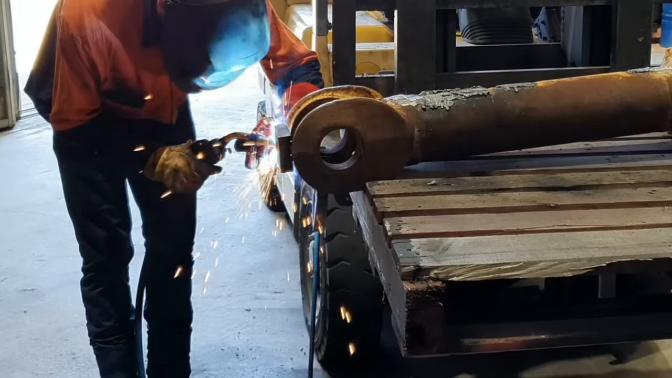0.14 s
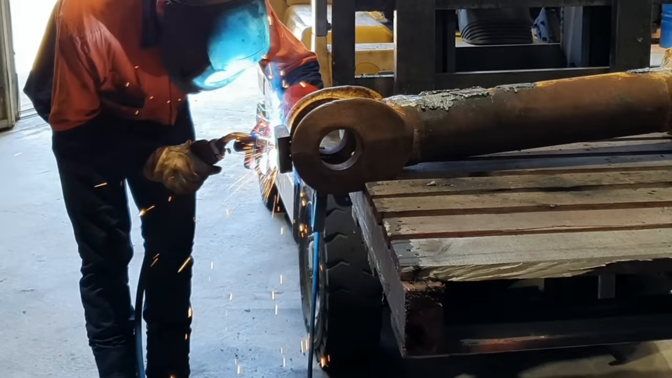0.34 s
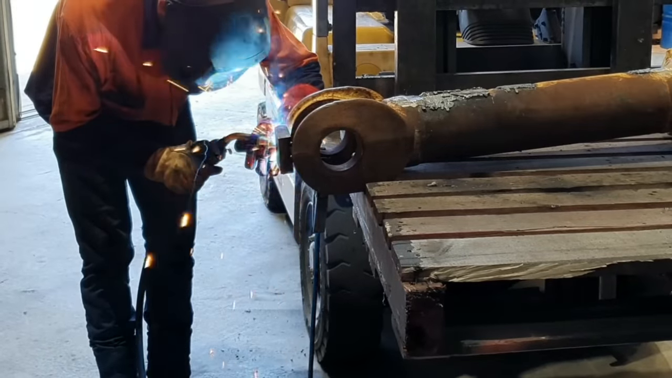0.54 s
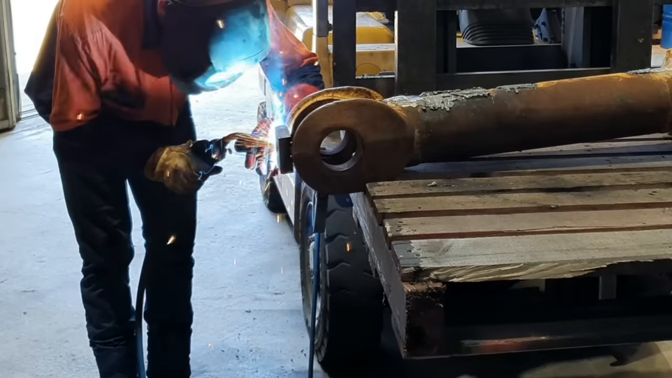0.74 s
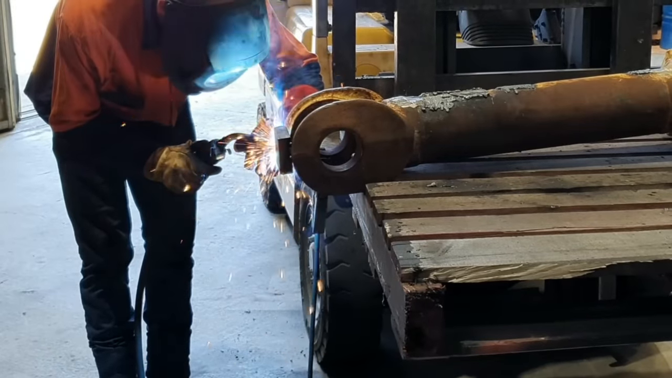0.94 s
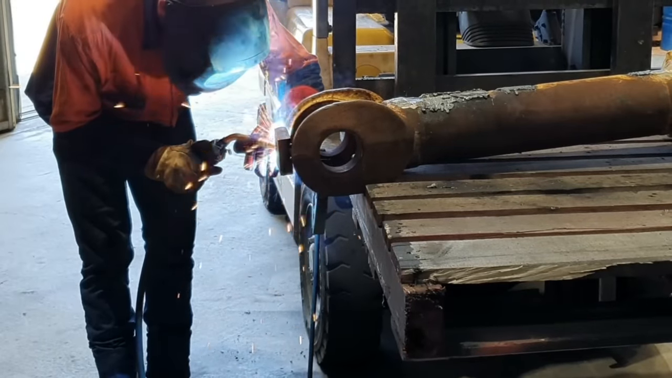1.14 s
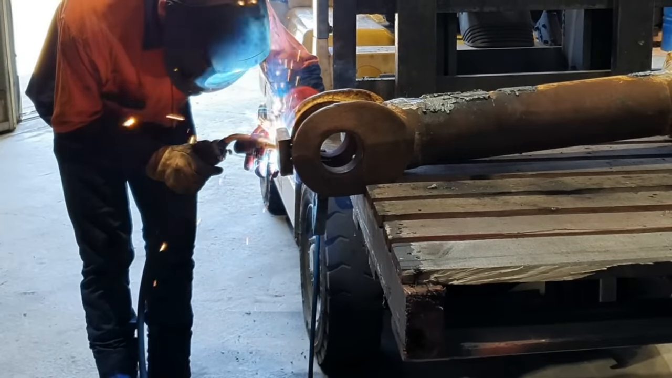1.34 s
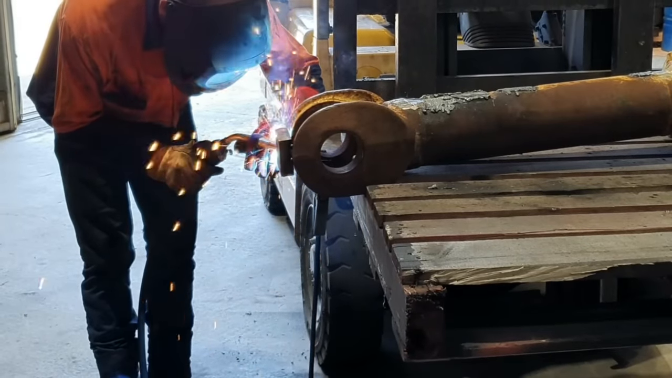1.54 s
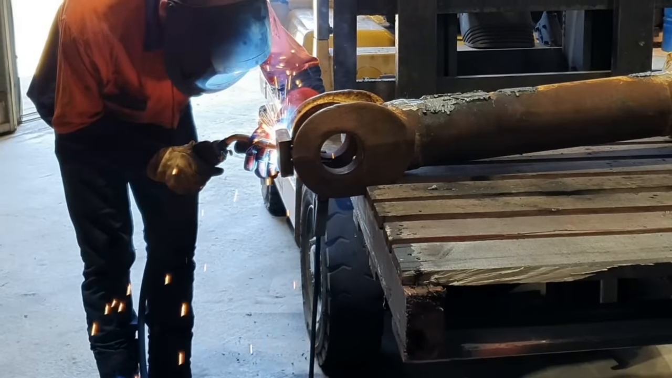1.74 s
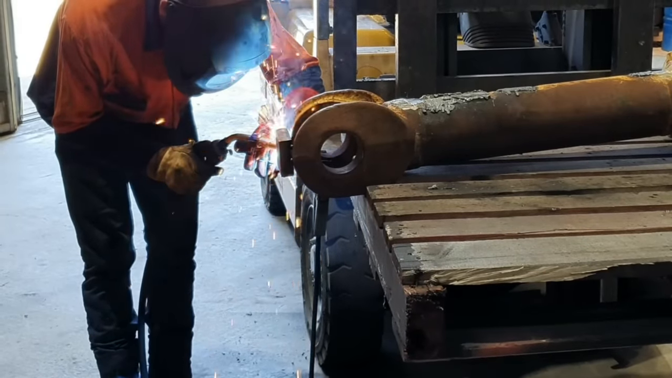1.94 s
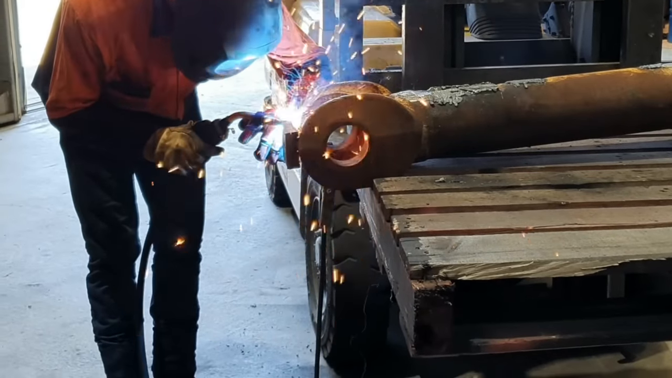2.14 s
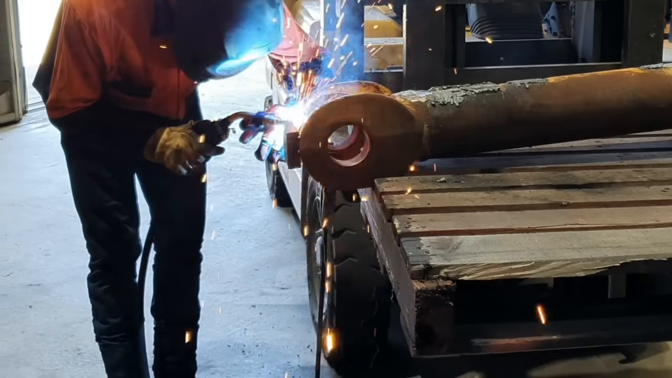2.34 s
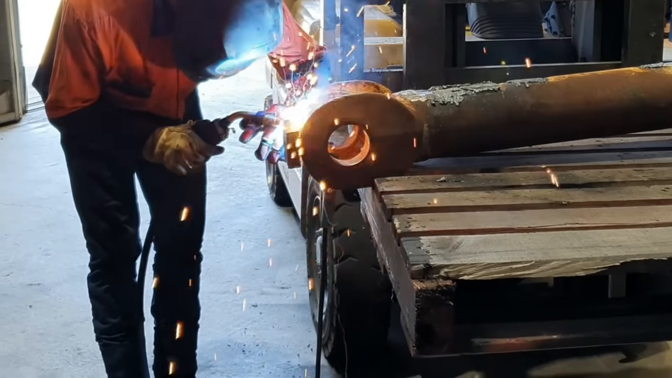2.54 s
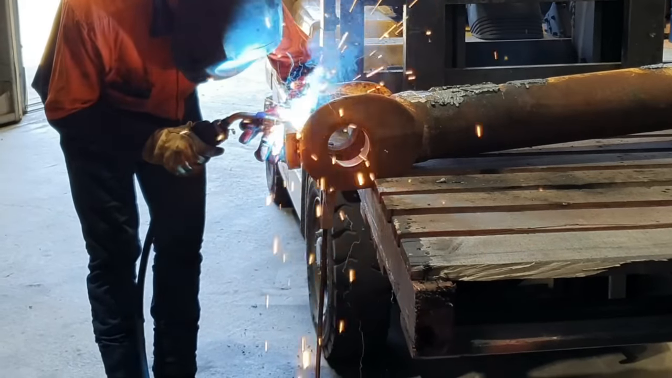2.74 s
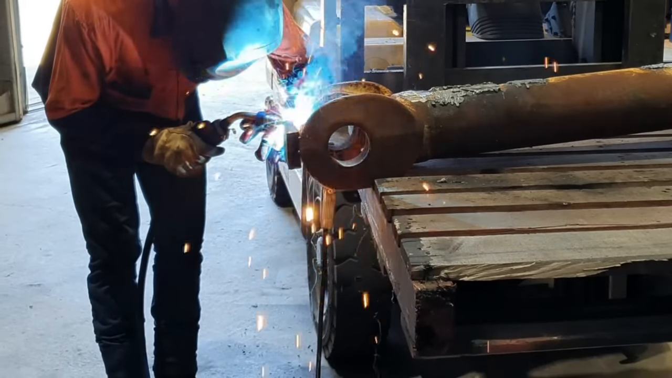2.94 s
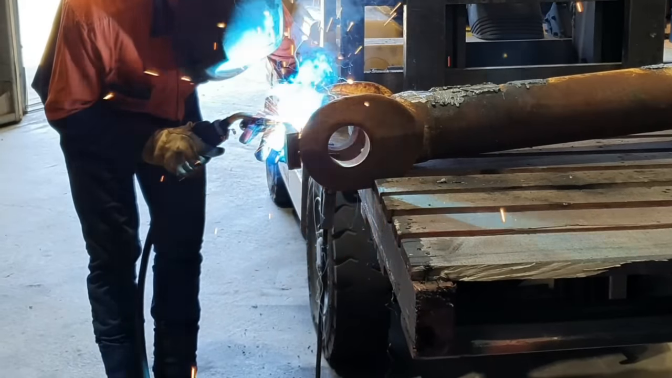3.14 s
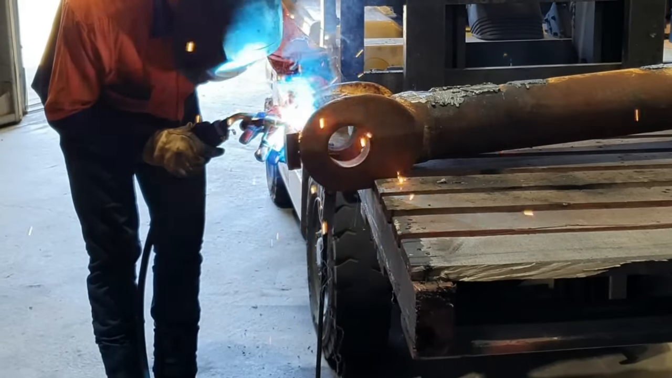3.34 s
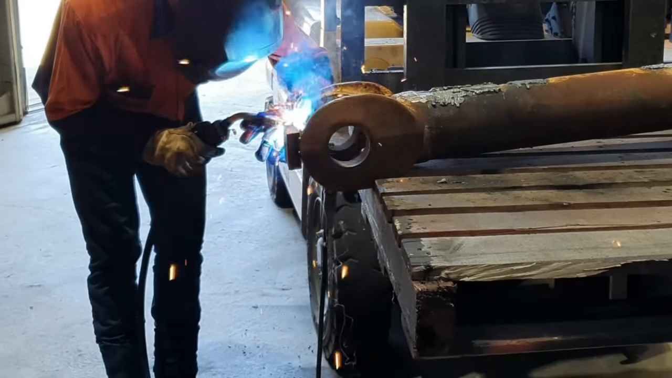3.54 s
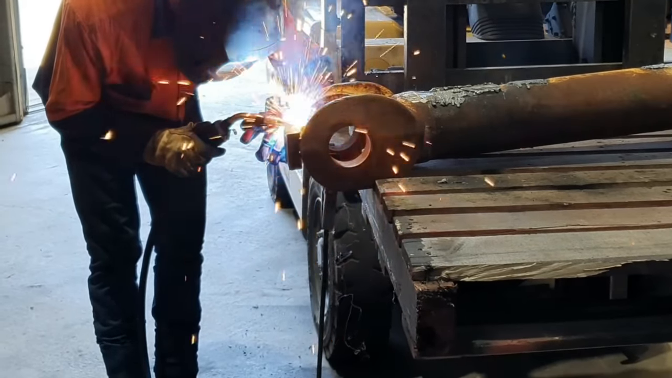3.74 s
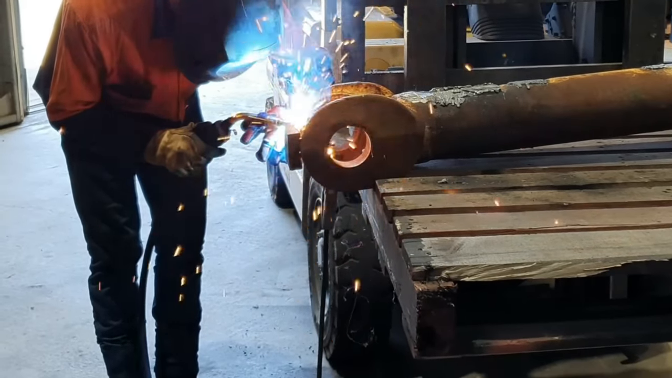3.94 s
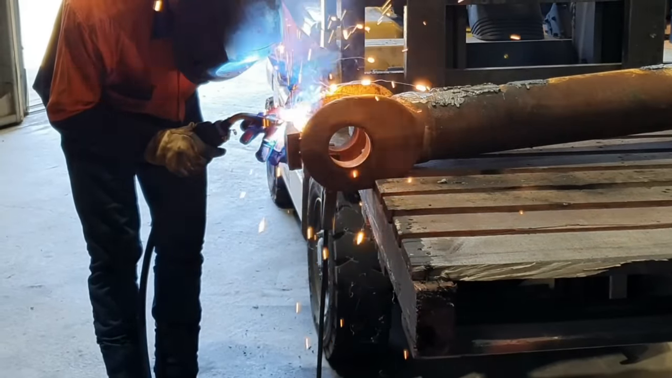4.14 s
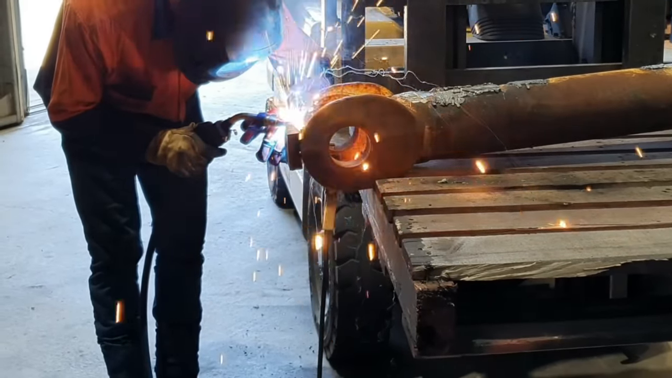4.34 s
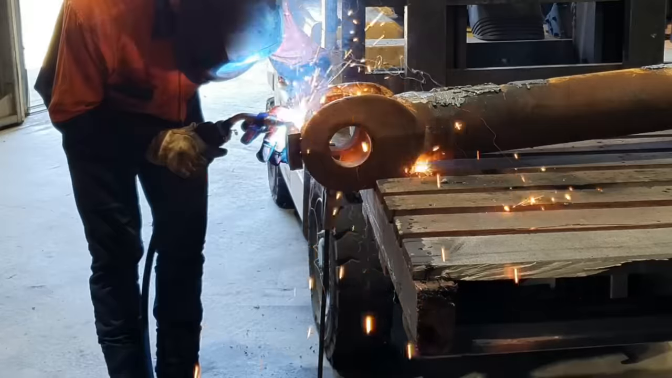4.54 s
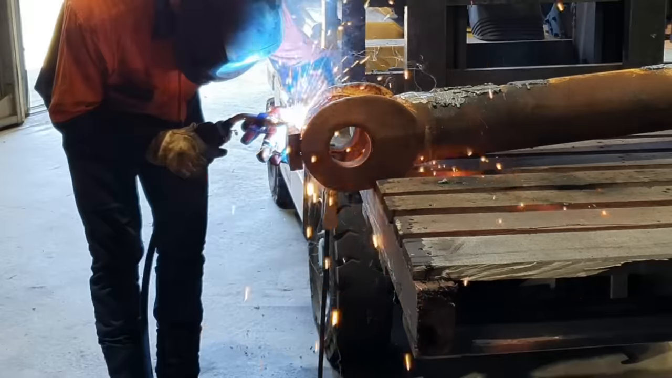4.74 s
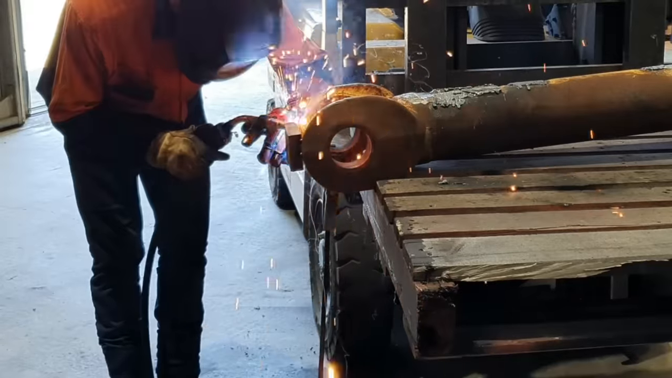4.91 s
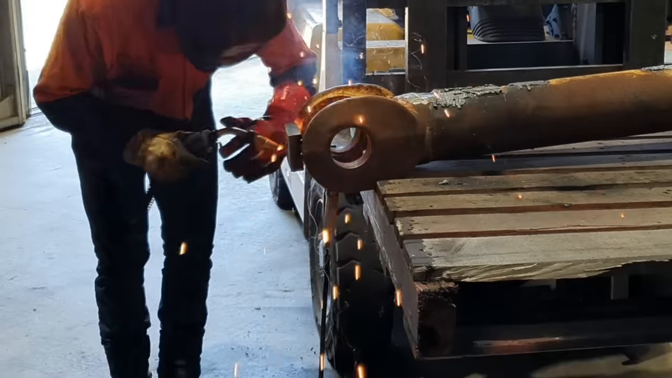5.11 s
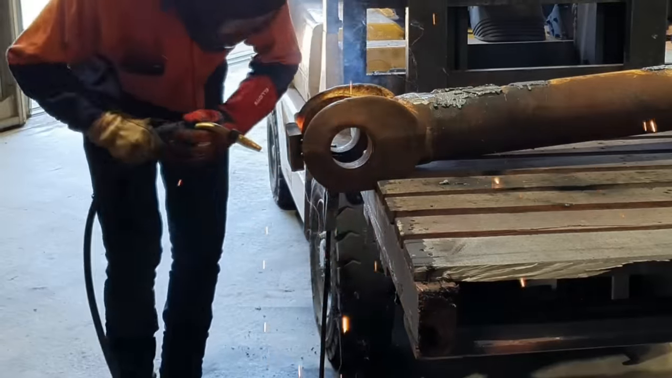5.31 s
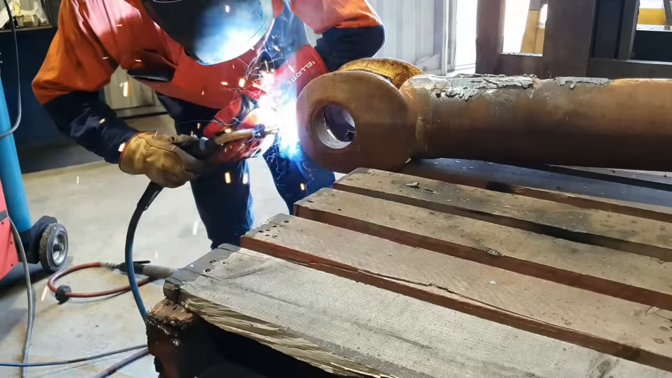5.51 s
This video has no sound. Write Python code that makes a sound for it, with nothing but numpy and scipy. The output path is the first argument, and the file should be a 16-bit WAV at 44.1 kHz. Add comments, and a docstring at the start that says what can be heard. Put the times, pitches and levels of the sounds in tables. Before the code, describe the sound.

Sharp rapid snaps and fizzing spatter from wire welding on steel in a hard workshop, a brief humming lull, then a cut-off restart.

```python
"""In a workshop, a MIG welder runs beads on a steel eye. Some fifty-five times a second the wire dips into the pool,
shorts, and the arc relights with a snap; each snap is a click with a dull pop and a brief spray of noise.
Between the snaps spatter crackles: random droplet clicks over a hiss. Delayed copies stand for the steel close by,
a fading noise tail for the hard room. A low rumble with a surging drone, made of shaped noise and an unsteady sine,
grows behind it and comes to the front, with soft air noise, while the arc rests, until a last weld starts abruptly."""
import sys
import numpy as np
from scipy import signal
from scipy.fft import rfft, irfft
from scipy.io import wavfile
from scipy.ndimage import uniform_filter1d

SR = 44100
rng = np.random.default_rng(int(sys.argv[2]) if len(sys.argv) > 2 else 0)


def pcm_store(signal):
    """Save signal as 16-bit PCM."""
    levels = np.round(np.clip(np.atleast_2d(signal), -1, 1) * 32767)
    wavfile.write(sys.argv[1], SR, levels.astype(np.int16).T)


N = 245637
TIME = np.arange(N) / SR
HZ = np.fft.rfftfreq(4096, 1 / SR)
# the torch moves on, the arc goes out, the last weld starts (s)
SECOND_BEAD_S, ARC_OFF_S, LAST_BEAD_S = 2.205, 4.965, 5.5125
# top of the sound's band (Hz)
EDGE_HZ = 15820
# The hardest snaps. Each row: time in seconds, level in dB and dull pop in dB, both before the gains in dips().
HARD_SNAPS = [(0.0188, -22.5, -13), (0.0397, -23.5, -11), (0.0583, -21.5, -15), (0.0745, -23.0, -14),
              (0.0937, -22.0, -12), (0.1114, -22.0, -11), (0.1307, -23.0, -10), (0.1476, -21.0, -14),
              (0.1533, -22.5, -12), (0.1835, -21.0, -12), (0.1938, -25.5, -10), (0.2072, -23.0, -9),
              (0.225, -24.5, -11), (0.2431, -22.5, -9), (0.2614, -23.5, -10), (0.2803, -22.0, -6),
              (0.2935, -23.0, -13), (0.3062, -23.5, -12), (0.3253, -21.5, -13), (0.373, -21.5, -14),
              (0.3788, -22.5, -11), (0.3903, -21.5, -11), (0.4079, -23.5, -9), (0.4289, -23.0, -12),
              (0.4756, -23.5, -13), (0.5549, -24.0, -11), (0.574, -20.0, -14), (0.5905, -23.0, -11),
              (0.6385, -22.0, -12), (0.6899, -23.0, -15), (0.7032, -21.5, -14), (0.7139, -24.0, -14),
              (0.7215, -23.0, -11), (0.7399, -23.5, -11), (0.7617, -22.5, -9), (0.7957, -21.5, -14),
              (0.8129, -24.5, -12), (0.8454, -22.5, -16), (0.8661, -24.5, -12), (0.9009, -22.5, -9),
              (0.915, -25.5, -10), (0.9328, -22.0, -10), (0.9464, -23.0, -13), (0.963, -22.0, -10),
              (0.9976, -24.0, -14), (1.0134, -23.5, -12), (1.0311, -23.5, -10), (1.0835, -21.5, -11),
              (1.0977, -24.0, -8), (1.1211, -20.5, -11), (1.1529, -22.0, -11), (1.1651, -24.5, -12),
              (1.1893, -23.0, -12), (1.2136, -24.0, -11), (1.2479, -22.0, -14), (1.2751, -21.0, -14),
              (1.2942, -21.5, -12), (1.3078, -22.0, -14), (1.3316, -18.5, -15), (1.3526, -21.5, -16),
              (1.3657, -19.0, -13), (1.3884, -22.0, -12), (1.4059, -22.5, -14), (1.4255, -22.0, -18),
              (1.4608, -20.0, -17), (1.4748, -18.5, -16), (1.5075, -23.0, -11), (1.5212, -21.5, -14),
              (1.5353, -22.0, -15), (1.5574, -19.5, -18), (1.5702, -21.5, -13), (1.5854, -20.0, -15),
              (1.6063, -21.5, -14), (1.6212, -18.5, -15), (1.6512, -21.0, -18), (1.6657, -18.0, -16),
              (1.6836, -21.0, -15), (1.6958, -21.0, -13), (1.714, -18.5, -17), (1.7302, -18.0, -16),
              (1.7473, -19.0, -16), (1.7609, -19.5, -13), (1.7827, -20.5, -18), (1.8032, -16.5, -16),
              (1.8199, -17.5, -18), (1.8356, -19.5, -17), (1.8677, -20.5, -15), (1.8769, -20.5, -16),
              (1.9075, -18.0, -16), (1.9336, -17.0, -17), (1.9686, -22.0, -19), (1.9835, -18.5, -16),
              (2.0009, -18.0, -16), (2.0172, -18.5, -14), (2.0354, -17.5, -15), (2.0523, -22.0, -13),
              (2.0688, -17.5, -13), (2.096, -16.0, -17), (2.1616, -17.0, -13), (2.1725, -18.5, -14),
              (2.2093, -18.5, -16), (2.2333, -18.0, -16), (2.258, -17.5, -16), (2.3129, -22.0, -14),
              (2.3269, -21.0, -14), (2.3378, -22.0, -12), (2.3571, -17.5, -15), (2.3817, -21.0, -13),
              (2.3952, -18.0, -14), (2.4228, -17.5, -16), (2.4481, -20.5, -15), (2.4866, -20.5, -12),
              (2.5178, -21.0, -11), (2.5442, -21.5, -11), (2.5775, -20.0, -14), (2.6339, -21.5, -13),
              (2.6719, -21.5, -11), (2.6903, -18.5, -11), (2.7048, -19.5, -19), (2.768, -22.5, -14),
              (2.8011, -24.0, -19), (2.836, -22.0, -13), (2.869, -22.5, -19), (2.9113, -24.0, -17),
              (2.9859, -25.0, -11), (3.0262, -19.0, -15), (3.0459, -24.0, -19), (3.1075, -24.5, -16),
              (3.1476, -18.0, -14), (3.1657, -18.0, -13), (3.1987, -24.0, -19), (3.2086, -23.5, -12),
              (3.2304, -23.5, -13), (3.2559, -18.5, -14), (3.2678, -23.5, -12), (3.3091, -24.5, -13),
              (3.3522, -19.0, -13), (3.3709, -22.0, -16), (3.3818, -23.5, -14), (3.4282, -23.0, -17),
              (3.4529, -18.5, -18), (3.4716, -18.0, -15), (3.527, -24.5, -14), (3.5332, -24.5, -11),
              (3.5433, -22.0, -13), (3.6088, -21.5, -14), (3.6272, -19.5, -16), (3.6336, -22.0, -11),
              (3.6466, -17.0, -14), (3.6626, -18.5, -16), (3.681, -19.5, -16), (3.7044, -18.0, -14),
              (3.7248, -19.0, -10), (3.7506, -19.0, -13), (3.7696, -18.5, -15), (3.793, -21.0, -7),
              (3.8122, -20.0, -17), (3.822, -21.5, -15), (3.841, -22.5, -17), (3.8673, -22.5, -16),
              (3.8855, -19.0, -13), (3.8963, -19.0, -13), (3.9148, -19.0, -14), (3.9392, -19.5, -13),
              (3.9583, -18.0, -17), (3.97, -21.5, -17), (3.991, -21.0, -15), (4.0036, -20.0, -15),
              (4.028, -20.5, -13), (4.0842, -19.5, -15), (4.1023, -20.5, -12), (4.1215, -20.5, -11),
              (4.1465, -19.5, -15), (4.1664, -20.0, -15), (4.191, -18.5, -15), (4.2136, -17.0, -19),
              (4.2339, -18.5, -15), (4.2563, -17.5, -16), (4.28, -16.5, -17), (4.3032, -18.5, -17),
              (4.3375, -17.5, -16), (4.3534, -17.5, -18), (4.3735, -19.5, -14), (4.3931, -18.0, -18),
              (4.4119, -16.5, -16), (4.43, -18.5, -17), (4.4478, -21.0, -16), (4.4664, -19.0, -19),
              (4.4857, -18.0, -15), (4.5152, -22.0, -16), (4.5357, -19.0, -18), (4.5531, -18.5, -18),
              (4.5711, -18.0, -19), (4.5907, -18.0, -17), (4.625, -20.5, -15), (4.6456, -17.5, -15),
              (4.6636, -17.5, -16), (4.6967, -21.0, -19), (4.7113, -16.5, -17), (4.7285, -21.5, -15),
              (4.7503, -21.5, -15), (4.7658, -19.0, -17), (4.7853, -18.0, -17), (4.8034, -19.0, -18),
              (4.8234, -20.0, -16), (4.8522, -20.0, -17), (4.8716, -20.5, -17), (4.8814, -22.0, -15),
              (4.9078, -21.0, -16), (5.5401, -22, -16), (5.5439, -31, -15), (5.5484, -29, -18),
              (5.567, -22, -15)]


def amp(db):
    """Turns decibels into a plain gain."""
    return 10 ** (np.asarray(db) / 20)


def unit(x):
    """Scales a sound to an rms (average strength) of 1."""
    return x / np.sqrt(np.mean(abs(x) ** 2) + 1e-20)


def read(points, hz):
    """Reads a table between its points, along log frequency."""
    f, value = np.transpose(points)
    return np.interp(np.log(hz + 1), np.log(f + 1), value)


def curve(points):
    """Reads a table between its points, along time."""
    return np.interp(TIME, *np.transpose(points))


def causal(db):
    """Makes the filter that has this gain over HZ and responds as promptly as possible."""
    cepstrum = irfft(np.log(amp(np.maximum(db, db.max() - 80))))
    half = len(HZ) - 1
    # folding the second half onto the first leaves nothing sounding ahead of its cause
    cepstrum[..., 1:half] *= 2
    cepstrum[..., half + 1:] = 0
    return irfft(np.exp(rfft(cepstrum)))


def through(x, response):
    """Passes a sound through a response, channel by channel."""
    return signal.fftconvolve(np.atleast_2d(x), np.atleast_2d(response), axes=1)[:, :N]


def clicks(s, size):
    """Places single-sample clicks at the times s (seconds)."""
    place = np.clip(np.round(s * SR).astype(int), 0, N - 1)
    return np.bincount(place, size, N)


def diffuse(length):
    """Makes spectra of noise arriving from all sides: alike at both microphone ports only in the bass."""
    # Each row: frequency in Hz, left-right likeness from 0 to 1.
    likeness = [(60, 0.93), (130, 0.99), (290, 0.85), (640, 0.48), (1400, 0.013), (16000, 0.0084)]
    hz = np.fft.rfftfreq(length, 1 / SR)
    a, b = np.exp(2j * np.pi * rng.random((2, len(hz))))
    alike = np.clip(read(likeness, hz), -1, 1)
    return hz, np.array([a, alike * a + np.sqrt(1 - alike ** 2) * b])


def arc_state():
    """How the arc runs: ordinary snaps (dB, before the gain in snaps()), sizzle and throatiness (dB)."""
    # Each row: time in seconds, ordinary snaps in dB, sizzle in dB, lift of the sizzle's low mids in dB.
    arc_rows = [(0, -27, -28, 11), (.35, -27.5, -33.5, -13), (.5, -27, -30, 6), (.66, -27, -36.5, 10.5),
                (.8, -25, -33, 8.5), (.9, -26.5, -32, 15.5), (1.05, -26.5, -34, 6), (1.3, -26.5, -32, 11.5),
                (1.8, -24.5, -30, -11), (2.2, -24.5, -32.5, -9), (2.681, -24, -27.5, -14),
                (2.95, -27, -33, 10.5), (3.1, -28, -34, 2), (3.249, -28, -33, 11), (3.499, -26, -32, -2),
                (3.588, -31, -31, 2), (3.65, -15, -33, -6), (3.85, -27, -28.5, 5), (4.06, -26, -35, 6),
                (4.3, -24.5, -38, -24), (4.96, -23, -27, 1)]
    s, *columns = np.transpose(arc_rows)
    return [np.interp(TIME, s, column) for column in columns]


def dips(dips_per_s=55, jitter_cycles=.13, steady_db=-23, jitter_per_db=.18):
    """Time, level and pop of each snap: the wire keeps a loose rhythm between hard snaps, looser when weak."""
    spread_db, pop_db, pop_spread_db = 1.3, 9, 2.5
    hard_gain_db, hard_pop_gain_db = 1.5, 21.5
    hard_s, hard_db, hard_pop_db = np.transpose(HARD_SNAPS)
    marks = np.r_[0, np.sort(hard_s[hard_s < ARC_OFF_S]), ARC_OFF_S]
    # fit a whole number of dips between neighbouring marks
    steps = np.maximum(np.round(np.diff(marks) * dips_per_s), 1)
    cycles = np.r_[0, np.cumsum(steps)]
    free = np.setdiff1d(np.arange(cycles[-1]), cycles)
    late, size, dull = np.clip(rng.standard_normal((N, 3))[:len(free)].T, -2, 2)
    db = np.interp(np.interp(free, cycles, marks), TIME, arc_state()[0])
    jitter = jitter_cycles + jitter_per_db * np.maximum(steady_db - db, 0)
    s = np.interp(free + jitter * late, cycles, marks)
    return (np.r_[s, hard_s], np.r_[db + spread_db * size, hard_db + hard_gain_db],
            np.r_[pop_db + pop_spread_db * dull, hard_pop_db + hard_pop_gain_db])


def snaps(pop_hz=3000, touch_db=-20, short_ms=3.2, short_spread=0.27, spray_hz=1200):
    """The wire ticks as it touches the pool; a few ms later the bridge bursts with a brief spray and the arc snaps on."""
    snap_db, spray_db, spray_s = 21.5, -2, .0003
    s, db, pop_db = dips()
    wait, size = rng.standard_normal((N, 2))[:len(s)].T
    crack = clicks(s, amp(db))
    pop = signal.lfilter(*signal.butter(1, pop_hz, fs=SR), clicks(s, amp(db) * (amp(pop_db) - 1)))
    touch_s = s - short_ms / 1000 * np.exp(short_spread * wait)
    touch = clicks(touch_s, amp(db + touch_db + 2 * size))
    # the spray swells and dies within about a millisecond
    age = TIME[:len(HZ)] / spray_s
    puff = np.sqrt(age) * np.exp(-age)
    spray = through(crack, puff / np.linalg.norm(puff))[0] * np.sign(rng.standard_normal(N))
    spray = signal.sosfilt(signal.butter(2, spray_hz, "high", fs=SR, output="sos"), spray)
    return amp(snap_db) * (crack + pop + touch + amp(spray_db) * spray)


def sizzle(per_s=380, spread_db=3, hiss_db=-11, throat_hz=3000):
    """Tiny droplets burst at random over the hiss of the burning arc, which sinks while the wire is shorted."""
    # Hiss of the last weld. Each row: time in seconds, level in dB.
    last_hiss = [(5.513, -29), (5.53, -30), (5.538, -42.5), (5.546, -22), (5.556, -32), (5.57, -36)]
    flare_throat = 1  # extra lift of the low mids, dB per dB of flare
    short_s, short_db = .0046, -5  # the short before each hard snap
    _, burn_db, throat_db = arc_state()
    flare_db = flares()
    burn_db, throat_db = burn_db + flare_db, throat_db + flare_throat * flare_db
    sizes = amp(spread_db * np.minimum(rng.exponential(1, N), 3))
    droplets = unit(sizes * (rng.random(N) < per_s / SR))
    burn = unit(droplets + amp(hiss_db) * rng.standard_normal(N))
    last = amp(curve(last_hiss)) * (TIME > LAST_BEAD_S) * unit(.5 * burn + rng.standard_normal(N))
    low_mids = signal.lfilter(*signal.butter(1, throat_hz, fs=SR), burn - burn.mean())
    burn = burn + (amp(throat_db) - 1) * low_mids
    hard_s = np.transpose(HARD_SNAPS)[0]
    shorted = np.cumsum(clicks(hard_s - short_s, None) - clicks(hard_s, None)) > 0
    return burn * amp(burn_db + short_db * shorted) * (TIME < ARC_OFF_S) + last


def flares():
    """Change of the sizzle (dB), up or down, as the arc stretches for a moment and shortens again."""
    # Each row: middle in seconds, length in seconds, lift of the sizzle in dB.
    flare_rows = [(0.29, .035, -1), (0.369, 0.038, 11.5), (0.722, 0.052, 5), (1.041, 0.055, 8),
                  (1.38, 0.038, -9), (2.158, .03, 7.5), (2.695, 0.024, 0), (3.727, 0.062, 7.5),
                  (4.13, .05, 9.5)]
    return sum(db * np.exp(-(2 * (TIME - s) / length) ** 2) for s, length, db in flare_rows)


def near_steel(paths, smooth_hz=4000):
    """Each path is a clean echo in the bass; edges and rough steel smear its treble in time."""
    # Sound from the arc meets the left port first. Each row: frequency in Hz, lead in radians.
    port_phase = [(200, 0), (1200, .05), (2100, .3), (2800, 1.6), (4200, 3), (5700, 4.2), (10000, 3.6),
                  (12000, 4.5), (15300, 6.4)]
    total = 0
    rough = HZ ** 4 / (HZ ** 4 + smooth_hz ** 4)  # 0 in the bass, 1 in the treble
    for delay_ms, bass_db, treble_db, scatter_ms, lead_ms in paths:
        wander = np.hypot(*unit(uniform_filter1d(rng.standard_normal((2, len(HZ))), size=24, axis=1)))
        late_ms = delay_ms + (np.array([[0], [lead_ms]]) + scatter_ms * wander ** 2 / 2) * rough
        gain = amp(bass_db + (treble_db - bass_db) * rough)
        # adding up the delays along frequency gives the phase
        total = total + gain * np.exp(-2j * np.pi * HZ[1] * np.cumsum(late_ms, 1) / 1000)
    total = total * np.exp(-1j * np.array([[0], [1]]) * read(port_phase, HZ))
    # scattering leaves a fine comb but favours no broad band
    return irfft(total / np.sqrt(uniform_filter1d(abs(total) ** 2, size=66, axis=1)))


def workshop(gap_s=.004, build_s=.014):
    """A dense echo of fading noise that builds up quickly and loses its highest treble first."""
    # Each row: frequency in Hz, time to fade by 60 dB in seconds.
    fade_times = [(200, 1), (1000, 0.74), (3000, 1.0), (6000, 0.9), (9000, 0.81), (12000, 0.5),
                  (16000, 0.38)]
    # Each row: frequency in Hz, echo level in dB.
    room_level = [(150, -5.5), (600, -6.5), (1500, -3), (3000, 0.5), (6000, 1.5), (8000, -2.5), (11000, 0),
                  (16000, -2)]
    hz, t, z = signal.stft(irfft(diffuse(SR)[1]) * np.sqrt(SR), SR, nperseg=256)
    t60 = read(fade_times, hz)[:, None]
    fade = np.exp(-np.log(1000) * t / t60)
    # a slow fade starts lower, so that its whole energy stays the same
    even = np.sqrt(2 * np.log(1000) / (t60 * SR))
    z *= amp(read(room_level, hz)[:, None]) * fade * even
    tail = signal.istft(z, SR, nperseg=256)[1][:, :SR]
    return tail * np.clip((TIME[:SR] - gap_s) / build_s, 0, 1)


def bead(arc, colour, paths, weaves_per_s=1.5):
    """The arc at one spot on the work, heard by way of the steel and the room."""
    # The two microphone ports. Each row: frequency in Hz, left minus right in dB.
    ports = [(60, -2.5), (700, 1), (1300, -5), (2300, -6.5), (3200, -4), (5000, -2), (6400, -.5),
             (7700, -5.5), (9200, 3), (10700, 4), (12200, -2), (13300, 1.5), (15300, -3.5)]
    db = read(colour, HZ)
    db = db - 10 * np.log10(np.mean(amp(db) ** 2 * (HZ < EDGE_HZ)))
    heard = through(arc, causal(db + np.array([[1], [-1]]) * read(ports, HZ) / 2))
    # an arc that is already burning has already filled the room: a reversed second goes ahead
    burning = np.concatenate([heard[:, SR:0:-1], heard], axis=1)
    # as the torch weaves along the seam, the pattern of the echo shifts
    turn = 2 * np.pi * weaves_per_s * np.arange(SR + N) / SR
    echo = sum(signal.fftconvolve(burning * share, workshop(), axes=1) for share in (np.cos(turn), np.sin(turn)))
    return through(heard, near_steel(paths)) + echo[:, SR:SR + N]


def background(rumble_db=0, last_db=-14):
    """Rumble and air noise, both shaped noise, with the drone; all fall away as the last weld starts."""
    # Levels before that fall. Each row: time in seconds, level in dB.
    rumble_level, air_level = [(0, -60), (.18, -51), (.3, -55), (.58, -51), (.75, -49), (1.3, -51),
                               (2.12, -52.5), (2.3, -48.5), (2.9, -46.5), (3.35, -42.5), (3.7, -47),
                               (4.6, -46.5), (5, -42.5), (5.4, -40.5)], [(0, -48.5), (2.2, -47.5), (4.9, -44), (5.1, -43), (5.5, -42)]
    # Spectra, scaled to the levels above. Each row: frequency in Hz, strength in dB per Hz.
    rumble_colour, air_colour = [(8, -60), (25, -20), (42, 2.5), (60, -4), (80, 0), (115, 0.5), (150, -11),
                                 (240, -2), (300, -7.5), (400, -11.5), (500, -42), (900, -36.5)], [(200, -13), (450, -4.5), (700, -1.5), (1300, -3),
                                                        (2200, -1), (3200, -9.5), (5000, -13), (8000, -28),
                                                        (16000, -43)]
    hz, z = diffuse(N)
    rumble = unit(irfft(z * amp(read(rumble_colour, hz)), N)) * amp(curve(rumble_level) + rumble_db)
    hz, z = diffuse(N)
    air = unit(irfft(z * amp(read(air_colour, hz)), N)) * amp(curve(air_level))
    return (rumble + air + drone()) * amp(last_db * (TIME > LAST_BEAD_S))


def drone(hz=61.2, wander_hz=2.76, drone_db=-3.5, edge_s=.048):
    """A surging low note, a sine of unsteady pitch, the same at both ports."""
    # Level between the surges. Each row: time in seconds, level in dB.
    rest_level = [(0, -59), (2.1, -55), (2.3, -50.5), (4, -49.5), (5.5, -43.5)]
    # Each row: start in seconds, length in seconds, level in dB before drone_db is added.
    surges = [(2.546, 0.092, -35.5), (2.96, 0.16, -38), (3.235, 0.1, -35), (3.577, 0.088, -34),
              (3.693, 0.12, -35), (4.057, 0.043, -36), (4.182, 0.11, -33.5), (4.408, 0.11, -36.5),
              (4.582, 0.068, -37), (4.704, 0.056, -37), (4.859, 0.12, -33.5), (5.018, 0.24, -34.5),
              (5.332, 0.086, -44), (5.45, 0.067, -47)]
    wander = unit(uniform_filter1d(rng.standard_normal(N), size=4000))
    level = amp(curve(rest_level))
    for start, length, db in surges:
        inside_s = np.minimum(TIME - start, start + length - TIME)
        level = np.maximum(level, amp(db + drone_db) * np.clip(.5 + inside_s / edge_s, 0, 1))
    return level * unit(np.sin(2 * np.pi * np.cumsum(hz + wander_hz * wander) / SR))


def scene():
    """The torch moves to a second spot without a break, rests, and strikes again at a third."""
    # Colour of the arc on each bead, its overall level evened out later.
    # Each row: frequency in Hz, strength in dB per Hz.
    first_colour, second_colour = [(25, -50.5), (100, -38.5), (250, -19), (370, -20), (480, -25),
                                   (650, -14), (880, -24.5), (1100, -21), (1450, -16), (1650, -20.5),
                                   (2200, -14.5), (2750, -17.5), (3150, -12.5), (4200, -13.5),
                                   (6300, -13.5), (7700, -4), (9500, -9), (12000, -1), (13300, -2.5),
                                   (15300, 3)], [(25, -48), (100, -17), (300, -22), (500, -21.5),
                                                         (680, -14), (950, -23), (1150, -21.5),
                                                         (1350, -17.5), (1650, -16.5), (2150, -22.5),
                                                         (2700, -17), (4200, -14.5), (6300, -15.5),
                                                         (7800, -7), (9500, -9.5), (12200, -2.5),
                                                         (13300, -3.5), (15500, 1)]
    last_colour = [(25, -52), (100, -42), (600, -17), (1500, -14), (2800, -8), (4300, 2), (5800, -8),
                   (7500, 1), (12000, 1.5), (15500, 10)]
    # Ways from the arc to the microphone, direct and off the steel; their levels count against each other.
    # Each row: delay in ms, bass in dB, treble in dB, treble scatter in ms, treble lead at the left port in ms.
    first_paths, second_paths = [(0, 0, 0, .35, 0), (0.95, -16, -1.5, .25, .3), (1.75, -10, -12, .25, -.2),
                                 (2.75, -.5, -.5, .2, -.1), (3.85, -2.5, -5, .3, .17),
                                 (5.2, -10, -12, .5, -.4), (11, -11, -11, .8, .4),
                                 (13.8, -13, -11, .4, -.3)], [(0, 0, 0, .3, 0), (1.0, -14, -3, .25, .3),
                                                      (3.02, -2, -7, .22, -.2), (3.9, -10, -4.5, .22, -.12),
                                                      (4.6, -15, -9.5, .6, .17), (9.5, -15, -11, 2, -.4),
                                                      (12, -12, -10, 2.5, .4)]
    last_paths = [(.25, 0, 0, .35, .22), (3.8, -14, -14, .5, -.2)]
    arc = snaps() + sizzle()
    moved, last = TIME > SECOND_BEAD_S, TIME > LAST_BEAD_S
    first_bead = bead(arc * ~moved, first_colour, first_paths)
    second_bead = bead(arc * (moved & ~last), second_colour, second_paths)
    last_bead = bead(arc * last, last_colour, last_paths)
    return first_bead + second_bead + last_bead + background()


def record(dry):
    """Rounds off the highest peaks, then cuts everything above the top of the band."""
    low_pass = signal.firwin(801, EDGE_HZ, window=("kaiser", 8), fs=SR)
    return signal.oaconvolve(np.tanh(dry), low_pass[None], "same")


dry = scene()
out = record(dry)
pcm_store(out)
```